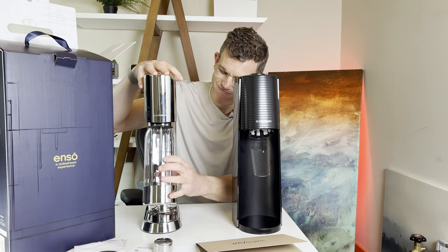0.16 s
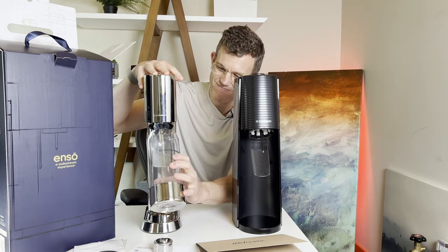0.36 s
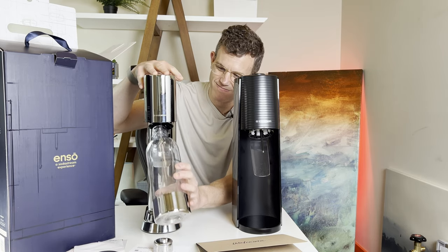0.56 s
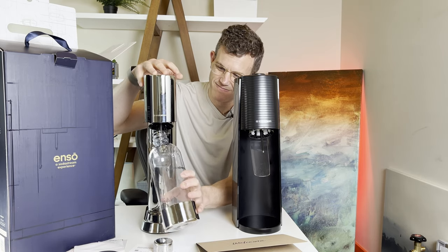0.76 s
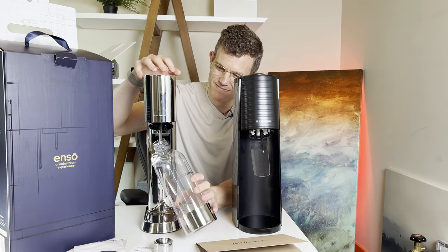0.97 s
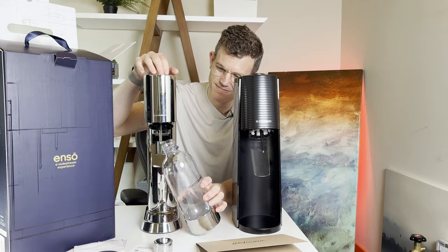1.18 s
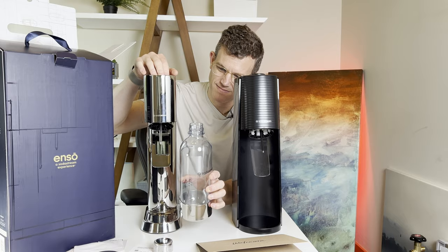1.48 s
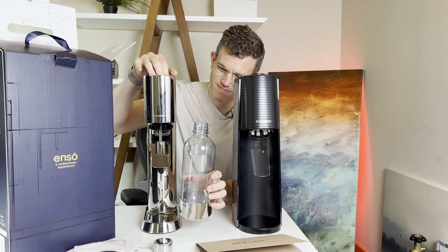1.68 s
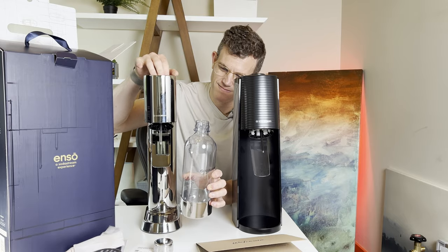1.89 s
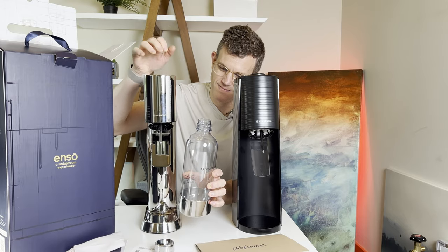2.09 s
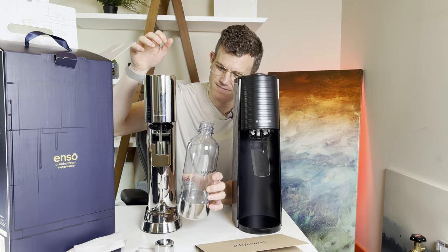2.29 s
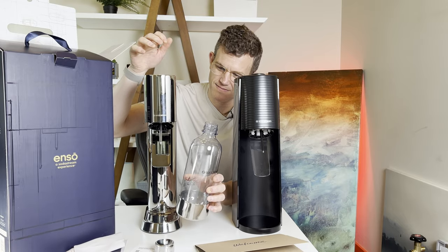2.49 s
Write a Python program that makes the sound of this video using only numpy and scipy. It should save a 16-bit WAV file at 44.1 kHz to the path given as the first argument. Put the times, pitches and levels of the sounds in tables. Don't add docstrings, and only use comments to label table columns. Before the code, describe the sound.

A soda maker's steel head unlocks with a hard clunk, a latch clacks, the hollow bottle knocks free, then the valve squeaks and gas hisses out and fades, close microphone in a small hard room.

```python
import sys
import numpy as np
from scipy import signal
from scipy.fft import rfft, irfft
from scipy.io import wavfile

SR = 44100
rng = np.random.default_rng(int(sys.argv[2]) if len(sys.argv) > 2 else 0)


def inscribe(sig):
    pcm = np.round(np.clip(np.atleast_2d(sig).T, -1, 1) * 32767)
    wavfile.write(sys.argv[1], SR, pcm.astype(np.int16))


def decibels_to_gain(level_db):
    exponent = np.asarray(level_db, float) / 20
    return 10 ** exponent


N = 116865


def rms_one(x):
    return x / np.sqrt(np.mean(x ** 2) + 1e-20)


def in_time(rows):
    s, value = np.transpose(rows)
    return np.interp(np.arange(N) / SR, s, value, left=value[0], right=value[-1])


def at_hz(points, hz):
    p = np.array(points)
    return np.interp(np.log(hz), np.log(p[:, 0]), p[:, 1])


def drift(rate_hz):
    r = np.exp(-80 * np.pi * rate_hz / SR)
    chance = rng.standard_normal(N // 40 + 2002)
    slow = signal.lfilter([1], [1, -2 * r, r * r], chance)[2000:]
    return np.interp(np.arange(N) / 40, np.arange(len(slow)), rms_one(slow))


def bands(x):
    thirds = 3 * np.log2(np.maximum(np.fft.rfftfreq(len(x), 1 / SR), 20) / 20)
    whole = rfft(x)
    for k in range(0, 32, 2):
        weight = np.cos(np.pi / 2 * np.clip((thirds - k) / 2, -1, 1)) ** 2
        yield 20 * 2 ** (k / 3), irfft(whole * weight, len(x))


def colour(x, spectrum):
    hz = np.maximum(np.fft.rfftfreq(8192, 1 / SR), 10)
    cepstrum = irfft(np.log(decibels_to_gain(at_hz(spectrum, hz))))
    cepstrum[1:4096] *= 2
    cepstrum[4097:] = 0
    h = irfft(np.exp(rfft(cepstrum)))
    return signal.fftconvolve(x, h / np.sqrt(np.sum(h ** 2)))[:N]


def hiss(spectrum, patchy_db, rough_db):
    gusts = drift(1.9)
    x = colour(rng.standard_normal(N) * decibels_to_gain(rough_db * drift(330.0)), spectrum)
    return [(hz, b * decibels_to_gain(patchy_db * (gusts + drift(23.0)))) for hz, b in bands(x)]


# freq_hz, level_db (per Hz)
HUM_COLOUR = [(20, -6), (74, -9), (142, -6), (310, -17), (700, -21), (1500, -30), (16000, -56)]


def room_hum():
    return decibels_to_gain(-54.5) * sum(b for hz, b in hiss(HUM_COLOUR, patchy_db=0.6, rough_db=0.5))


# freq_hz, t60_s
ROOM_T60 = [(60, 0.8), (250, 0.76), (1000, 0.57), (4000, 0.53), (12000, 0.31)]


def room(x):
    level_db, gap_s = -8.5, 0.002
    t = np.arange(SR) / SR
    tail = sum(b * decibels_to_gain(-60 * t / at_hz(ROOM_T60, hz)) for hz, b in bands(rng.standard_normal(SR)))
    tail = tail * np.clip((t - gap_s) / 0.0014, 0, 1)
    return decibels_to_gain(level_db) * signal.fftconvolve(x, tail / np.sqrt(np.sum(tail ** 2)))[:N]


# middle_s, low_hz, high_hz, level_db
SIDE_PATCHES = [
    (.722, 9000, 11100, -65),
    (2.092, 11000, 12500, -27),
    (2.348, 6900, 9000, -41),
    (2.488, 13100, 14500, -42),
    (2.604, 13100, 15800, -47),
]


def side_patches():
    out, size = np.zeros(N + SR), int(.046 * SR)
    for s, low_hz, high_hz, db in SIDE_PATCHES:
        band = signal.butter(6, [low_hz, high_hz], "band", fs=SR, output="sos")
        patch = signal.sosfilt(band, rng.standard_normal(size))
        out[int(s * SR) - size // 2:][:size] += decibels_to_gain(db) * rms_one(patch) * np.hanning(size)
    return out[:N] * np.array([[1], [-1]])


# start_s, pitch_hz, swell_s
BODY_TONES = [(.225, 110, .05), (.235, 55, .06), (.592, 135, .02), (1.097, 172, .045), (1.097, 114, .07),
              (.72, 289, .12), (.76, 730, .1), (2.25, 289, .15), (1.376, 600, .005), (1.374, 800, .004),
              (.2225, 522, .004), (.237, 760, .003), (.286, 520, .008), (1.0952, 1000, .0012),
              (1.183, 820, .017), (.318, 1080, .006), (1.958, 1450, .006), (.582, 1040, .018),
              (.585, 3838, .025), (.536, 1150, .004), (.224, 1100, .004), (1.107, 1800, .004),
              (1.945, 600, .005), (2.008, 200, .008)]
BODY_TONE_DB = [-35, -42, -41.5, -29, -40, -53, -54, -59, -35, -40, -8, -12, -23, -2.5, -36.5, -30.5, -25.5, -26,
                -41.5, -30.5, -9.5, -28.5, -31.5, -34]


def body_tones():
    out, t = np.zeros(N + SR), np.arange(SR // 2) / SR
    for (s, hz, swell), db in zip(BODY_TONES, BODY_TONE_DB):
        phase = 2 * np.pi * hz * t + 1.2 * drift(6.9)[:len(t)]
        level = decibels_to_gain(db + 3.9 * drift(77.0)[:len(t)])
        envelope = np.e * t / swell * np.exp(-t / swell)
        out[int(s * SR):][:len(t)] += level * envelope * np.sin(phase)
    return out[:N]


# freq_hz, level_db (per Hz)
CRACK_COLOUR = [(2500, -31), (4000, -6), (9600, -3), (11700, 1.5), (15500, -14), (20000, -18.5)]


def contacts(rows, modes, spectrum, ring_db, damp, body_db, crack_db, soft_hz):
    low, high, ring = np.zeros(N), np.zeros(N), 0
    t = np.arange(2000) / SR
    noise = rng.standard_normal((len(rows), 2, 2000))
    luck_db = rng.normal(0, 2.5, (len(rows), 14))
    at = [int(row[0] * SR) for row in rows]
    for (s, db, top_db, ms), i, (a, b) in zip(rows, at, noise):
        shape = (1 - np.exp(-t / .0004)) * np.exp(-t / (max(ms, .5) / 1000))
        low[i:i + 2000] += decibels_to_gain(db + body_db) * a * shape
        high[i:i + 2000] += decibels_to_gain(top_db + crack_db) * b * shape
    for k, (hz, level_db, t60) in enumerate(modes):
        clicks = np.full(N, 1e-18)
        clicks[at] = decibels_to_gain(np.array(rows)[:, 1] + level_db + ring_db + luck_db[:, k])
        r = decibels_to_gain(-60 / (min(t60, .6) * damp * SR))
        w = 2 * np.pi * hz / SR
        poles = [1, -2 * r * np.cos(w), r * r]
        tone = signal.lfilter([0.0374, 0.528, -0.023, -0.524], poles, clicks)
        ring = ring + tone * (-1) ** k * decibels_to_gain(3.2 * drift(90.0))
    ring = signal.sosfilt(signal.butter(2, soft_hz, fs=SR, output="sos"), ring)
    return ring + colour(low, spectrum) + colour(high, CRACK_COLOUR)


# pitch_hz, level_db, t60_s
HEAD = [(167, -16.5, 0.15), (310, -9.5, 0.09), (410, -9.5, 0.24), (527.6, 1, 0.38), (620, -4.5, 0.18),
        (775, -2, .15), (1055, 3, 0.17), (1148, -2, .2), (1360, -12.5, 0.37), (1669, -13.5, 0.18),
        (1840, -16, 0.22), (2430, -9, 0.61)]
# start_s, level_db (peak), crack_db, rattle_ms
BUMPS = [
    (1.368, -35, -53.5, 7.6),
    (1.785, -28, -40, 8.1),
    (1.931, -25.5, -58, 27),
    (1.958, -20.5, -52, 13),
    (2.010, -30.5, -60, 31),
]
# freq_hz, level_db (per Hz)
BUMP_COLOUR = [(30, -10), (250, 3.5), (650, 0), (1400, -1.5), (3000, -13.5), (7000, -32.5)]


def handling_bumps():
    return contacts(BUMPS, HEAD, BUMP_COLOUR, ring_db=-25.5, damp=0.241, body_db=-2.5, crack_db=2, soft_hz=1507)


# freq_hz, level_db (per Hz)
LATCH_COLOUR = [(100, -42.5), (400, -13), (1040, -9), (1440, -8), (1800, -1), (3800, -14.5), (6000, -22.5),
                (9000, -60)]
# pitch_hz, level_db, t60_s
NECK = [(754, 0, .3), (1090, 3, 0.16), (1442, -4, 0.16), (1650, -2, 0.13), (1900, -8, .15),
        (2946, -16.5, 0.14), (4150, -25, .1), (5030, -15, .1)]
# start_s, level_db (peak), crack_db, rattle_ms
RUBS = [
    (1.012, -37.5, -61, 6.1),
    (1.056, -35, -64, 5.1),
    (1.066, -24, -50, 3.1),
    (1.0685, -23, -44.5, 3.1),
    (1.072, -28.5, -53.5, 3.1),
    (1.081, -28, -56, 8.1),
]


def neck_rubs():
    return contacts(RUBS, NECK, LATCH_COLOUR, ring_db=-6, damp=0.24, body_db=-6.5, crack_db=6, soft_hz=4500)


# pitch_hz, level_db, t60_s
CATCH = [(1160, -6, .12), (1760, -1, 0.11), (2380, -6, 0.056), (3920, -17, .1), (5000, -11.5, .1)]
# start_s, level_db (peak), crack_db, rattle_ms
TICKS = [
    (.515, -32, -38, 11),
    (.530, -24.5, -25.5, 2.6),
    (.5335, -24.5, -35.5, 4.4),
    (.5405, -23, -50.5, 6.8),
]


def catch_ticks():
    return contacts(TICKS, CATCH, LATCH_COLOUR, ring_db=-2.5, damp=0.18, body_db=-6, crack_db=1.3, soft_hz=5500)


# pitch_hz, level_db, t60_s
LATCH = [(1035.5, -3.5, 0.55), (1124, -10, .3), (1780, -3, 0.16), (1923, -10.5, 0.25), (2316, -14, 0.34),
         (2995, -11, 0.29), (2945, -10, 0.34), (3230, -16.5, .25), (3360, -15.5, .15), (3780, -13, 0.39),
         (4340, -22.5, .3), (4760, -14.5, .1)]
# start_s, level_db (peak), crack_db, rattle_ms
CLACKS = [
    (.056, -33, -45, 6.1),
    (.178, -34.5, -49, 15),
    (.200, -28.5, -52.5, 15),
    (.5795, -11.5, -26.5, 1.3),
    (.5815, -8.5, -30, 2.1),
    (.5838, -4, -26.5, 1.47),
]


def latch_clacks():
    return contacts(CLACKS, LATCH, LATCH_COLOUR, ring_db=-9.5, damp=0.22, body_db=-2, crack_db=2.0, soft_hz=5960)


# freq_hz, level_db (per Hz)
HEAD_COLOUR = [(30, -28), (150, -5), (550, -4), (1080, -5), (1700, -8.5), (2400, -11), (6000, -20),
               (9000, -46)]
# start_s, level_db (peak), crack_db, rattle_ms
CLUNKS = [
    (.155, -29.5, -40.5, 12),
    (.193, -24, -31.5, 5.9),
    (.2195, -15, -29.5, 5.1),
    (.2232, -6, -5.5, 5.4),
    (.226, 1.5, -11.5, 2.5),
    (.233, -4.5, -9.5, 3),
    (.2385, 0.5, -11, 3.4),
    (.270, -26, -25, 5),
    (.292, -29, -34, 2.2),
]


def head_clunks():
    return contacts(CLUNKS, HEAD, HEAD_COLOUR, ring_db=-15.5, damp=0.14, body_db=-1.5, crack_db=1, soft_hz=2574)


# pitch_hz, level_db, t60_s
BOTTLE = [(389, -14, 0.27), (528, -16.5, .3), (615, -18.5, 0.18), (818.3, -4.5, 0.36), (905, -6.5, 0.25),
          (978, -3.5, 0.19), (1096, 6.5, 0.093), (1115, -5.5, 0.3), (1397, -10, 0.22), (1750, -16.5, .15),
          (2073, -19.5, .1)]
# freq_hz, level_db (per Hz)
BOTTLE_COLOUR = [(60, -46), (380, -22.5), (640, -12), (800, -4), (1100, -10), (1500, -17.5), (6000, -46.5),
                 (9000, -64.5)]
# start_s, level_db (peak), crack_db, rattle_ms
KNOCKS = [
    (1.0955, -2, -31.5, 2.43),
    (1.111, -9, -59.5, 1.7),
    (1.123, -20.5, -55, 2.5),
    (1.143, -23, -49, 3),
    (1.183, -37, -64, 1.7),
    (1.377, -38, -56, 6.1),
]


def bottle_knocks():
    return contacts(KNOCKS, BOTTLE, BOTTLE_COLOUR, ring_db=-11.0, damp=0.32, body_db=-1, crack_db=5.0, soft_hz=1620)


# time_s, level_db
LEAK = [(0, -42), (.2, -35.5), (.45, -59.5), (.65, -54.5), (1.0, -54.5), (1.2, -57.5), (1.4, -68),
        (1.7, -73)]
# freq_hz, level_db (per Hz)
LEAK_COLOUR = [(300, -33), (770, -7), (1000, -16), (5000, -15), (7700, -10), (9600, -13.5), (11800, -6.5),
               (15800, -17)]


def leak():
    return decibels_to_gain(in_time(LEAK)) * sum(b for hz, b in hiss(LEAK_COLOUR, patchy_db=0.5, rough_db=0.0))


# start_s, length_s, start_hz, end_hz, waver_share
SQUEALS = [(1.771, .016, 6900, 6850, .03), (1.790, .011, 6500, 6750, .015), (1.789, .010, 9200, 9900, .025),
           (1.793, .024, 3400, 3400, .06), (1.806, .014, 2210, 2240, .015), (1.817, .08, 2285, 2305, .006),
           (1.235, .14, 13300, 10700, .015), (.02, .13, 11200, 11000, .025),
           (.268, .018, 13200, 12800, .03), (1.403, .075, 4450, 4350, .07), (1.405, .075, 2900, 2600, .3),
           (1.55, .1, 6000, 6300, .12), (1.800, .012, 9800, 8700, .025), (1.800, .012, 7000, 6900, .02),
           (1.772, .014, 8800, 8600, .08)]
SQUEAL_DB = [-52, -21.5, -27, -31, -24.5, -26.5, -59.5, -40, -20, -64.5, -59, -69.5, -25.5, -37, -55]


def squeals():
    out = np.zeros(N)
    for (s, length, start_hz, end_hz, share), db in zip(SQUEALS, SQUEAL_DB):
        i = int(s * SR)
        u = np.arange(int(length * SR)) / (length * SR)
        waver, flutter = drift(370.0)[:len(u)], drift(120.)[:len(u)]
        hz = (start_hz + (end_hz - start_hz) * u) * (1 + share * waver)
        envelope = np.minimum(u / 0.092, 1) * (1 - u ** 5.1)
        tone = np.sin(2 * np.pi * np.cumsum(hz) / SR)
        out[i:i + len(u)] += decibels_to_gain(db + 1.9 * flutter) * envelope * tone
    return out


# freq_hz, level_db (per Hz)
JET_COLOUR = [(60, -18.5), (280, -19), (1030, -17.5), (5850, -18), (6350, -11.5), (9500, -9), (12300, 0),
              (15800, -11.5)]


def jet():
    opens_s, first_db, full_db, rise_s = 1.786, -29, -14.5, 0.047
    sags_s, sag_db, sag_power = 1.864, 34.5, 1.413
    t = np.arange(N) / SR
    since = np.maximum(t - opens_s, 0)
    build_db = (first_db - full_db) * np.exp(-since / rise_s)
    swing_db = build_db - sag_db * np.maximum(t - sags_s, 0) ** sag_power
    seep = decibels_to_gain(-23.5) * np.clip((t - opens_s) / 0.019 + 1, 0, 1)
    gate = np.clip(since / 0.0064, 0, 1) + seep
    out = 0
    for hz, b in hiss(JET_COLOUR, patchy_db=0.7, rough_db=0.5):
        follows = 1.52 if hz < 700 else 1.165 if hz < 4000 else 1
        out = out + b * decibels_to_gain(full_db + swing_db * follows)
    return gate * out


def scene():
    hits = head_clunks() + latch_clacks() + catch_ticks() + neck_rubs() + bottle_knocks() + handling_bumps()
    gas, tones = jet() + leak(), squeals()
    echoes = room(hits + decibels_to_gain(-4.5) * gas + decibels_to_gain(-8) * tones)
    mono = body_tones() + hits + gas + tones + echoes + room_hum()
    return np.array([mono, mono])


def top_cut(x):
    return signal.sosfilt(signal.butter(12, 16630, fs=SR, output="sos"), x)


def record(dry):
    x = signal.sosfilt(signal.cheby2(14, 50, 15900 * 1.01, fs=SR, output="sos"), dry)
    limited = x / (1 + np.abs(x / .74) ** 6) ** (1 / 6)
    return top_cut(limited + side_patches())


dry = scene()
out = record(dry)
inscribe(out)
```